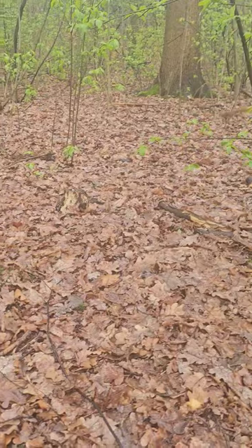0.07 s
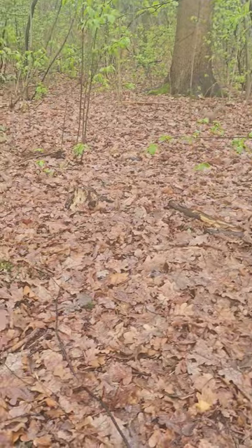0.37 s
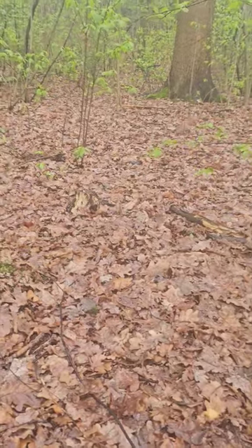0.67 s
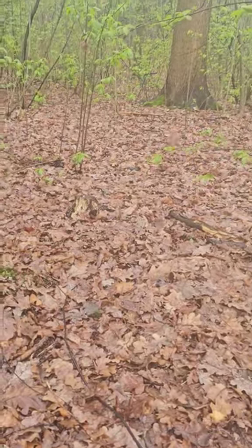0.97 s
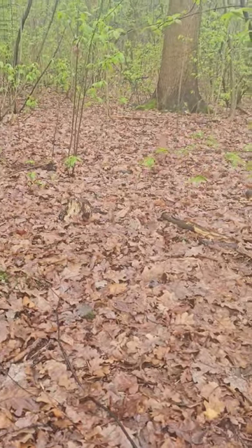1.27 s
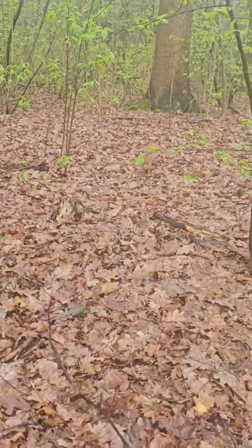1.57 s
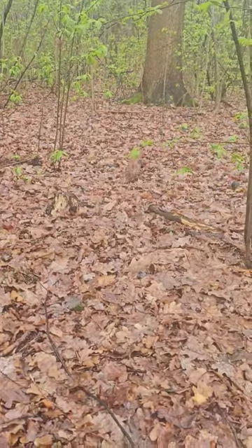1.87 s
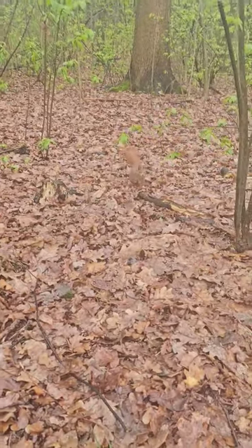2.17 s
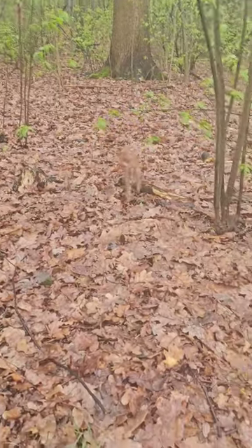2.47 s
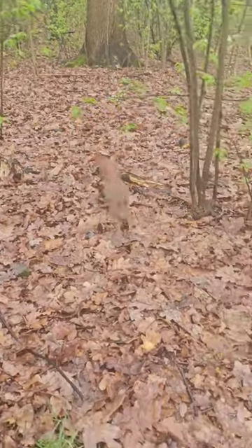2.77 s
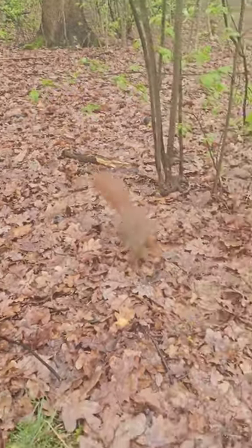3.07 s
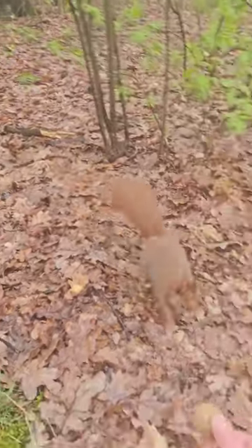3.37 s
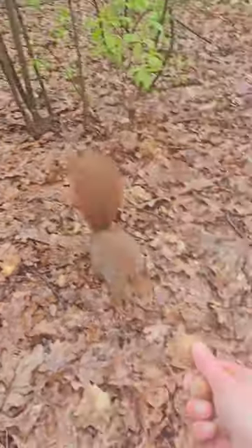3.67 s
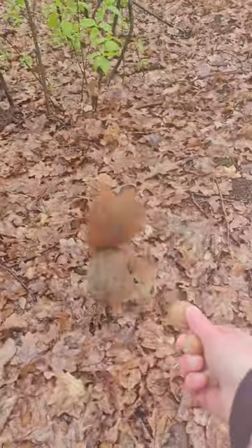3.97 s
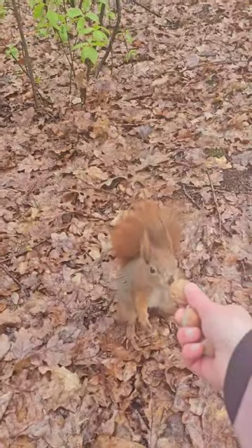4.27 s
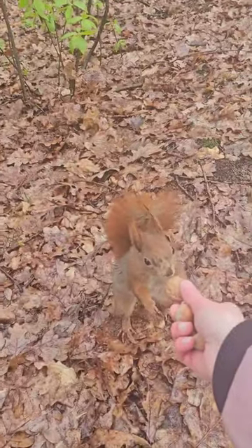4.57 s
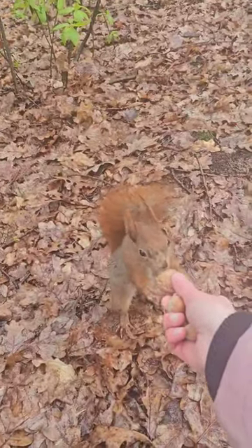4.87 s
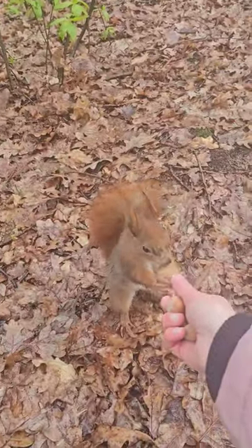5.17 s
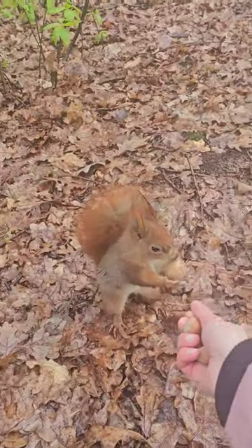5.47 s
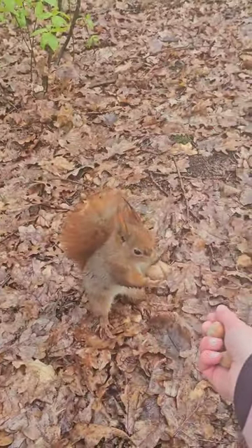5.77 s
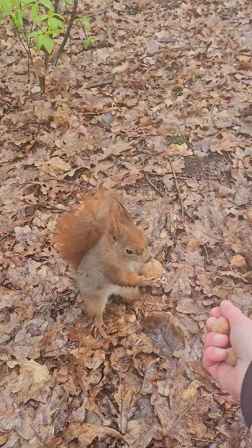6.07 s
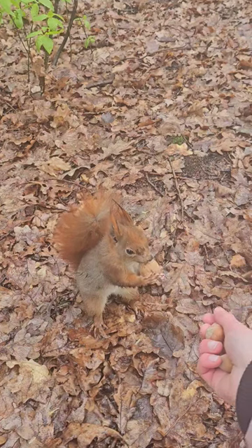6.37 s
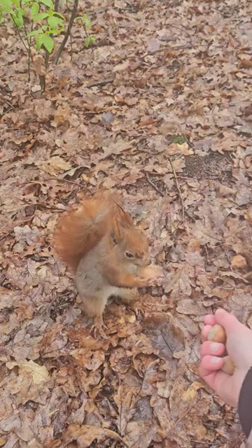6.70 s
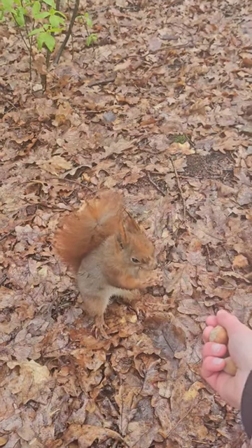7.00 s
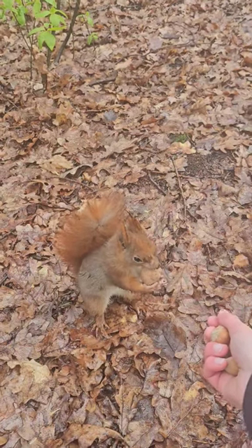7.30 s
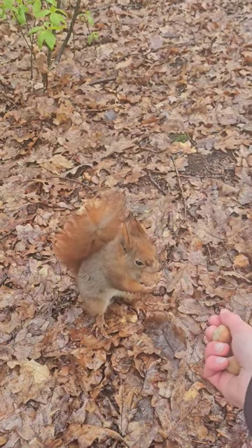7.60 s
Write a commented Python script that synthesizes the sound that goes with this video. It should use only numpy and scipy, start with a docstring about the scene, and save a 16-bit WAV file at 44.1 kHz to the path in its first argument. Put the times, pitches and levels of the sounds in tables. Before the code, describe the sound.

Walnuts clack sharply together in a hand, then a squirrel rustles through dry leaves and nibbles, with faint birds in a forest.

```python
"""Calling a squirrel with walnuts

Walnuts are shaken in a hand close to a phone: their hollow shells clack, grind and knock on the palm.
A squirrel bounds up through dry leaves, takes a nut and turns it, scraping it with its teeth.
Small birds whistle and echo in the spring wood, and far traffic rumbles underneath."""
import sys
import numpy as np
from scipy import signal
from scipy.fft import rfft, irfft, next_fast_len
from scipy.io import wavfile

SR = 44100
rng = np.random.default_rng(int(sys.argv[2]) if len(sys.argv) > 2 else 0)


def master_out(mix):
    """Clip the mix to full scale and print it as 16-bit PCM to the path in sys.argv[1]."""
    frames = np.transpose(np.atleast_2d(mix))
    ceiling = np.clip(frames, -1, 1)
    pcm = np.round(ceiling * 32767).astype(np.int16)
    wavfile.write(sys.argv[1], SR, pcm)


N = 341334
T = np.arange(N) / SR

# Each shake of the hand: a graze, a rub, a first clack and a second, usually louder and duller clack.
# 0-2 first clack: t/s, level/dB, hardness/dB (more is brighter); 3-4 graze: lead/s, level/dB
# 5-6 rub: level against the first clack/dB, hardness/dB
# 7-9 second clack: delay/s, level/dB, hardness/dB
# 10-11 shell's ring: main f/Hz, upper f/Hz; 12 grinding: level/dB
# 13-14 knock on the palm: delay/s, level/dB; 15-16 ring of the cupped hand: f/Hz, level/dB
SHAKES = [(0.5181, 0.5, -3.5, 0.0032, -14, -16, 8, 0.0038, 4, -8, 3750, 9500, -33, .004, 5.5, 594, -24),
          (0.6450, -6, 0.5, 0.0018, -18, -15, 3, 0.0038, -1, -9, 3400, 10240, -19.5, .0113, -1, 494, -22),
          (0.7790, -6, 0, 0.0014, -6.5, -17, 3.5, .0031, -1, -4.5, 3250, 9400, -18, .0037, 7.5, 540, -20.5),
          (1.291, -0.5, 7, 0.0028, -18, -17, 3, .0016, 0.5, 3, 3670, 8070, -37, .0012, -19.5, 1183, -15.5),
          (1.4281, 1, 4, 0.0062, -9, -5, 9, 0.0047, -0.5, -6.5, 3380, 8900, -25.5, 0.0022, -8.5, 1397, -25.5)]


def undb(db):
    """Turn decibels into a factor to multiply by."""
    return 10 ** (np.asarray(db) / 20)


def unit(x):
    """Scale a sound to an average (rms) strength of 1."""
    return x / np.sqrt(np.mean(x ** 2) + 1e-20)


def curve(rows):
    """Join rows of t/s, value with straight lines."""
    return np.interp(T, *np.transpose(rows))


def over_hz(points, size):
    """Spread rows of f/Hz, value over every frequency of a spectrum."""
    hz, value = np.transpose(points)
    return np.interp(np.log(np.arange(size // 2 + 1) * SR / size + 1), np.log(hz), value)


def colour(x, points):
    """Shape a sound's tone by rows of f/Hz, level/dB; it fades away below the first row."""
    size = next_fast_len(x.shape[-1] + 2048, True)
    hz = np.arange(size // 2 + 1) * SR / size + 1
    gain = undb(over_hz(points, size)) / np.sqrt(1 + (points[0][0] / 2 / hz) ** 2)
    # make the filter ring only after a sound, never before it
    cepstrum = irfft(np.log(gain), size)
    cepstrum[1:size // 2] *= 2
    cepstrum[size // 2 + 1:] = 0
    return irfft(rfft(x, size) * np.exp(rfft(cepstrum)), size)[..., :x.shape[-1]]


def wander(rate):
    """A random drift of about 1 either way, turning `rate` times a second."""
    knots = rng.standard_normal(2048)
    return np.interp(T * rate, np.arange(len(knots)), knots)


def add(out, s, x):
    """Mix a sound into both channels, starting at s seconds."""
    i = max(int(round(s * SR)), 0)
    out[:, i:i + x.shape[-1]] += x[..., :max(N - i, 0)]


def echoes(x, t60, build_s):
    """Blurred echoes from trunks and ground; t60 is the time in seconds to fade by 60 dB."""
    t = T[:SR]
    tail = rng.standard_normal((2, SR)) * undb(-60 * t / t60) * (1 - np.exp(-(t / build_s) ** 2))
    return signal.fftconvolve(x, unit(tail) / np.sqrt(SR), axes=1)[:, :N]


def crackle(size, spread_db):
    """Dense grains of sound, very unequal in size and different left and right."""
    grains = rng.standard_normal((2, size))
    return unit(grains * undb(spread_db * np.minimum(rng.exponential(size=size), 7)))


def far_noise(tone):
    """Noise from all around, alike in both channels only in the bass."""
    # how alike left and right are: f/Hz, likeness (1 = the same)
    likeness = [(150, 0.99), (300, .88), (600, 0.41), (1600, 0.03)]
    alike = over_hz(likeness, N)
    mid, side = rfft(rng.standard_normal((2, N)))
    pair = mid * np.sqrt(1 + alike) + np.array([[1], [-1]]) * side * np.sqrt(1 - alike)
    return unit(colour(irfft(pair, N), tone))


def traffic(drone_hz=63.4, drone_db=-6, octave_db=-9, swell_db=1.5, hiss_db=-52.5):
    """Rumble and tyre hiss from beyond the wood, with a wavering low drone and its octave."""
    # tone of the rumble and of the tyre hiss: f/Hz, level/dB
    rumble_tone = [(20, -24.5), (41, -9), (65, 0.5), (97, -9), (130, -9), (155, -18), (231, -19),
                   (313, -27.5), (1500, -118)]
    hiss_tone = [(200, -19), (600, -3.5), (850, -0.5), (1350, -3.5), (2000, -12), (2700, -27.5),
                 (4200, -25.5), (6000, -35.5), (9000, -29), (11000, -44.5)]
    # loudness of the rumble and drone: t/s, level/dB
    rumble_level = [(3.8, -42), (6.5, -43)]
    phase = 2 * np.pi * np.cumsum(drone_hz + 2 * wander(9)) / SR
    drone = np.sin(phase) * undb(drone_db + 1.9 * wander(10))
    octave = np.sin(2 * phase) * undb(drone_db + octave_db + 2.4 * wander(5.3))
    rumble = far_noise(rumble_tone) * undb(swell_db * wander(7))
    tilt_db = np.interp(T, (3.1, 4.5), (0, -3.5))  # less hiss as the phone tilts down to the squirrel
    hiss = far_noise(hiss_tone) * undb(hiss_db + tilt_db + .5 * wander(14))
    return (drone + octave + rumble) * undb(curve(rumble_level)) + hiss


def whistle(length, start_hz, middle_hz, end_hz, trill, trill_hz=170, waver=.0055, flutter_db=2):
    """A bird's thin note bends through three pitches, with a quick trill on it."""
    progress = np.linspace(0, 1, int(length * SR))
    bend = np.polyfit([0, .5, 1], [start_hz, middle_hz, end_hz], 2)
    wobble = trill * np.sin(2 * np.pi * trill_hz * length * progress)
    wobble += waver * wander(200)[:len(progress)]
    off_pitch = .0067 * rng.standard_normal()
    hz = np.polyval(bend, progress) * (1 + wobble + off_pitch)
    flutter = undb(flutter_db * wander(90)[:len(progress)])
    swell = np.sqrt(np.abs(np.sin(np.pi * progress)))
    return flutter * swell * np.sin(2 * np.pi * np.cumsum(hz) / SR)


def bird_notes(pair_gap_s=.29, high_note_db=-7):
    """List the notes of the lone calls, falling pairs and see-saw song: t/s, level/dB, call."""
    # a song of a rising and a high note in turn: start t/s, end t/s, level/dB, first call
    seesaw_songs = [(0.176, 0.5, -60, "high"), (4.195, 6.1, -62.5, "rise")]
    # wait before the next see-saw note: call -> wait/s
    beat_s = {"rise": .255, "high": .185}
    # a second bird answers with two falling notes: t/s, level/dB
    falling_pairs = [(0.462, -64), (2.12, -62.5), (4.82, -64)]
    # single calls of other birds: t/s, level/dB, call
    lone_calls = [(0.175, -54, "chip"), (0.578, -58.5, "chip"), (0.78, -58, "flick"), (1.0, -54.5, "flick"),
                  (2.27, -72, "held"), (3.03, -73.5, "held"), (3.58, -64, "peak"), (3.78, -65, "rise"),
                  (4.43, -67, "peak"), (5.24, -71, "peak"), (5.88, -71, "arch"), (7.135, -60.5, "seep"),
                  (7.4, -77, "held")]
    notes = lone_calls + [(s + lag, db, "fall") for s, db in falling_pairs for lag in (0, pair_gap_s)]
    for s, end, db, call in seesaw_songs:
        while s < end:
            notes.append((s, db + high_note_db * (call == "high"), call))
            s += beat_s[call]
            call = "high" if call == "rise" else "rise"
    return notes


def birds(far_direct_db=-2.5, near_echo_db=-7, far_song_db=-68, trunks_db=-8):
    """Calls bounce off near trunks and linger in the wood; one far, repeated song is all echo."""
    # note shapes: call -> length/s, start f/Hz, middle f/Hz, end f/Hz, trill as a share of pitch
    shapes = {"rise": (.11, 4030, 4320, 4350, .03), "fall": (.1, 5210, 5030, 4950, .01),
              "high": (.07, 5700, 5830, 5820, .007), "peak": (.07, 6120, 6010, 5970, .006),
              "chip": (.04, 4380, 4470, 4270, .012), "held": (.42, 4200, 4200, 4160, .02),
              "seep": (.09, 7700, 7750, 6300, .045), "swoop": (.15, 2750, 2980, 3480, .03),
              "flick": (.05, 4620, 4570, 4050, .015), "arch": (.13, 3330, 3220, 2780, .01)}
    # leaves soak up the highest part of the echo: f/Hz, level/dB
    foliage = [(4300, 3), (6000, 2), (7500, -7)]
    direct, into_wood = np.zeros((2, 2, N))
    for s, db, call in bird_notes():
        note = undb(db) * whistle(*shapes[call])
        near = call in ("chip", "flick", "arch", "seep")
        add(direct, s, note * undb(0 if near else far_direct_db))  # leaves screen the further birds
        add(into_wood, s, note * undb(near_echo_db if near else 0))
    for s in np.arange(4.38, 5.9, .279):
        add(into_wood, s, undb(far_song_db) * whistle(*shapes["swoop"]))
    trunks = echoes(into_wood, t60=.1, build_s=.004)
    wood = echoes(into_wood, t60=.9, build_s=.03)
    return direct + undb(trunks_db) * trunks + colour(wood, foliage)


def crumple(size, spread_db):
    """Dry leaves give way in tiny snaps: a new loudness every millisecond or two."""
    snaps = np.minimum(rng.exponential(size=size), 4)
    return undb(spread_db * np.repeat(snaps, 64)[:size])


def leaf_litter(spread_db=2.5, flutter_db=2.03, snap_db=1.58):
    """A fine, uneven rustle of dry leaves, in which single leaves snap."""
    # tone of the rustle: f/Hz, level/dB
    rustle_tone = [(1500, -1.5), (3000, -0.5), (5500, -4.5), (9000, -3.5), (11000, -8), (14500, -8.5),
                   (16000, -23.5)]
    # loudness of the rustle: t/s, level/dB
    rustle_level = [(0.3, -62), (0.67, -58), (1.38, -62.5), (1.7, -71), (1.87, -60), (2.1, -62.5),
                    (2.43, -58), (2.97, -66), (3.7, -57.5), (4.15, -59.5), (4.4, -64), (6.1, -64.5),
                    (6.45, -71)]
    grains = crackle(N, spread_db) * crumple(N, snap_db)
    return unit(colour(grains, rustle_tone)) * undb(curve(rustle_level) + flutter_db * wander(22))


def press(t, length):
    """The push of a paw rises and falls once over `length` seconds."""
    return np.sin(np.pi * np.minimum(t / length, 1))


def squirrel_paws(tick_t60=.017, tick_body_db=-12, thud_s=.019):
    """Paws crush leaves in short, gritty bursts and thud on the soil; twigs and claws tick."""
    # snaps of twigs and leaves, then claws on the nut: t/s, level/dB
    ticks = [(0.867, -47), (0.9985, -50), (2.674, -58), (2.731, -52), (2.8003, -52), (2.912, -56),
             (3.0457, -49.5), (3.351, -54), (3.5306, -42), (3.7344, -53), (3.9522, -44), (5.0008, -50),
             (5.3551, -53), (5.499, -39.5)]
    # paws land in the leaves or scuff the nut: t/s, length/s, level/dB, lower crunch against that/dB
    steps = [(2.737, 0.083, -61.5, -1), (2.863, 0.079, -61, 4), (2.999, 0.052, -63, -6),
             (3.125, 0.047, -63.5, -7), (3.228, .04, -65, -1), (3.34, 0.062, -64, -2),
             (3.444, 0.043, -57, 1), (3.526, 0.035, -61.5, 8), (3.888, 0.052, -59, -3),
             (4.033, 0.054, -55, 0), (4.248, 0.079, -53, 1.5), (4.998, 0.0084, -55.5, 10)]
    # the heavier leaps hit the soil: t/s, level/dB
    landings = [(2.516, -31.5), (3.532, -31)]
    # tone of the crisp top, the lower crunch and the thud: f/Hz, level/dB
    top_tone = [(1500, 3), (3000, 12.5), (9000, 5.5), (12000, -3.5)]
    body_tone = [(300, -11), (650, 10), (1300, 5.5), (2300, 8.5), (4500, -6.5), (8000, -30)]
    thud_tone = [(300, -5), (600, -1), (3000, -36)]
    top, body, soil = np.zeros((3, 2, N))
    t = T[:SR // 4]
    for s, db in ticks:
        snap = rng.standard_normal((2, len(t))) * undb(db - 60 * t / tick_t60)
        add(top, s, snap)
        add(body, s, undb(tick_body_db) * snap.sum(axis=0))
    for s, length, db, body_db in steps:
        grains = crackle(len(t), spread_db=3) * crumple(len(t), spread_db=1.5)
        crush = unit(grains) * press(t, length) * undb(db)
        add(top, s, crush)
        add(body, s, undb(body_db) * crush.sum(axis=0))
    for s, db in landings:
        add(soil, s, undb(db) * press(t, thud_s) * rng.standard_normal(len(t)))
    return colour(top, top_tone) + colour(body, body_tone) + colour(soil, thud_tone)


def squirrel_teeth(rise_s=.00053, t60=.019, spread_db=3):
    """Teeth scrape the shell in small, thin ticks."""
    # bites on the shell: t/s, level/dB
    bites = [(5.927, -56), (6.0632, -49), (6.139, -50), (6.2433, -48.5), (6.3246, -52.5), (6.5242, -54.5),
             (6.616, -55), (6.7785, -54), (6.91, -55), (7.4762, -53)]
    # their thin tone: f/Hz, level/dB
    bite_tone = [(1500, 4), (3000, 5), (5500, 6), (9000, 5), (12000, -6)]
    out = np.zeros((2, N))
    t = T[:4096]
    for s, db in bites:
        add(out, s, crackle(len(t), spread_db) * (1 - np.exp(-t / rise_s)) * undb(db - 60 * t / t60))
    return colour(out, bite_tone)


def palm_knocks(hand_db=5, bounce_s=.004, bounce_db=-8.5, cup_t60=.0092):
    """The nuts knock on the palm and bounce once; the air in the cupped hand rings briefly."""
    # tone of a knock on the hand: f/Hz, level/dB
    hand_tone = [(80, -33), (220, -4.5), (400, -6), (530, 2.5), (720, -5.5), (1300, 0), (2500, -13.5),
                 (6000, -27)]
    knocks, cup = np.zeros((2, 2, N))
    t = T[:2048]
    for s, *_, delay, db, cup_hz, cup_db in SHAKES:
        add(knocks, s + delay, undb([db]))
        add(knocks, s + delay + bounce_s, undb([db + bounce_db]))
        swell = 1 - np.exp(-2 * cup_hz * t)
        add(cup, s + delay, swell * undb(cup_db - 60 * t / cup_t60) * np.cos(2 * np.pi * cup_hz * t))
    return undb(hand_db) * colour(knocks, hand_tone) + cup


def grinding(spread_db=3, t60=.041):
    """After each second clack, the ridges of the shells slide to rest with a short, gritty sound."""
    # tone of the grinding: f/Hz, level/dB
    grind_tone = [(1800, -16), (3400, 3), (6000, -7.5), (8300, -2), (16000, -26.5)]
    out = np.zeros((2, N))
    t = T[:4096]
    for shake in SHAKES:
        second_clack_s, db = shake[0] + shake[7], shake[12]
        grains = crackle(len(t), spread_db)
        add(out, second_clack_s, unit(grains + grains.sum(axis=0)) * undb(db - 60 * t / t60))
    return colour(out, grind_tone)


def contacts(rub_lead_s=.0017, slide_db=-11.5, settle_s=.0053, settle_db=-18):
    """List every touch of shell on shell: t/s, level/dB, hardness/dB, main f/Hz, upper f/Hz."""
    # light touches between shakes: t/s, level/dB, hardness/dB
    touches = [(0.598, -25.5, 10), (1.2303, -35.5, -4)]
    # how the shell rings at those touches: main f/Hz, upper f/Hz
    touch_hz = (3730, 11000)
    other_nut = 1.07  # grazes, rubs and slides ring the other nut, pitched this many times higher
    rows = [(*touch, *touch_hz) for touch in touches]
    for shake in SHAKES:
        s, first_db, hard_db, graze_lead, graze_db, rub_db, rub_hard_db = shake[:7]
        gap, second_db, soft_db, main_hz, upper_hz = shake[7:12]
        clacks = [(s, first_db, hard_db),
                  (s + gap, second_db, soft_db),
                  (s + gap + settle_s, second_db + settle_db, soft_db)]
        rubs = [(s - graze_lead, graze_db, soft_db),
                (s - rub_lead_s, first_db + rub_db, rub_hard_db),
                (s + gap / 2, first_db + slide_db, hard_db)]
        rows += [(*clack, main_hz, upper_hz) for clack in clacks]
        rows += [(*rub, main_hz * other_nut, upper_hz) for rub in rubs]
    return rows


def shell_ring(t, hz, tones):
    """A struck shell rings with several pure tones that die away fast."""
    return sum(undb(db - 60 * t / t60) * np.sin(2 * np.pi * hz * ratio * t) for ratio, db, t60 in tones)


def walnuts(crack_db=-12, slide_s=.0006, grate_t60=.011, right_lag_s=4.2e-5, ground_db=-37, wood_db=-51):
    """Each contact grates and rings the hollow shell; harder ones bring out its upper tones."""
    # the shell's main and upper tones: multiple of the main or upper pitch, level/dB, t60/s
    main_tones = [(.37, -11, .005), (.53, -19.5, .005), (.92, -6.5, .008), (1, 0.5, .008),
                  (1.06, -9.5, 0.0055), (1.14, -14.5, .007), (1.36, -12, .005)]
    upper_tones = [(0.918, -9, .005), (0.998, -8.5, 0.006), (1.06, -10.5, 0.0061)]
    # tone of the crack where the shells meet: f/Hz, level/dB
    crack_tone = [(1500, 3.5), (3300, 5.5), (5800, -6), (8500, 8), (11500, -11.5), (16000, -19.5)]
    # the right microphone hears the nuts with a tone of its own: f/Hz, level/dB
    right_tone = [(30, 2.5), (4500, -0.5), (9000, -1.5), (10800, 4)]
    rings, cracks = np.zeros((2, 2, N))
    t = T[:2048]
    at_mics = np.maximum(t - np.array([[0], [right_lag_s]]), 0)  # the nuts are nearer the left one
    swell = 1 - np.exp(-(at_mics / slide_s) ** 2)  # the wrinkled shells slide, so each contact swells
    grate = swell * undb(-60 * t / grate_t60)
    for s, db, hard_db, main_hz, upper_hz in contacts():
        low = shell_ring(at_mics, main_hz, main_tones)
        high = shell_ring(at_mics, upper_hz, upper_tones)
        add(rings, s, undb(db) * swell * (low + undb(hard_db) * high))
        shared_grit = np.interp(at_mics, t, rng.standard_normal(len(t)))
        grit = shared_grit + rng.standard_normal((2, len(t)))
        add(cracks, s, grit * grate * undb(db + hard_db / 2))
    # a shell is too small to give off much sound below 1000 Hz
    rings = signal.sosfilt(signal.butter(1, 1000, "high", fs=SR, output="sos"), rings)
    left, right = rings + undb(crack_db) * colour(cracks, crack_tone) + grinding() + palm_knocks()
    direct = np.array([left, colour(right, right_tone)])
    # soft leaf litter and far trunks give very little back
    ground = undb(ground_db) * echoes(direct, t60=.067, build_s=.013)
    wood = undb(wood_db) * echoes(direct, t60=.3, build_s=.015)
    return direct + ground + wood


def scene():
    """Everything in the wood together."""
    return walnuts() + squirrel_paws() + squirrel_teeth() + leaf_litter() + birds() + traffic()


def record(dry):
    """The phone opens its input after a moment, rounds the highest peaks and cuts the top treble."""
    start_s, fade_s, top_hz = .112, .003, 15600
    opened = np.tanh(dry) * np.clip((T - start_s) / fade_s, 0, 1)
    return signal.sosfilt(signal.ellip(8, .2, 80, top_hz, fs=SR, output="sos"), opened)


dry = scene()
out = record(dry)
master_out(out)
```